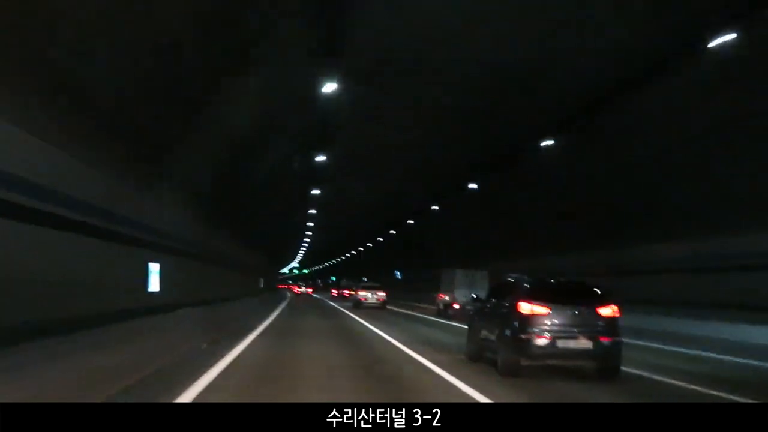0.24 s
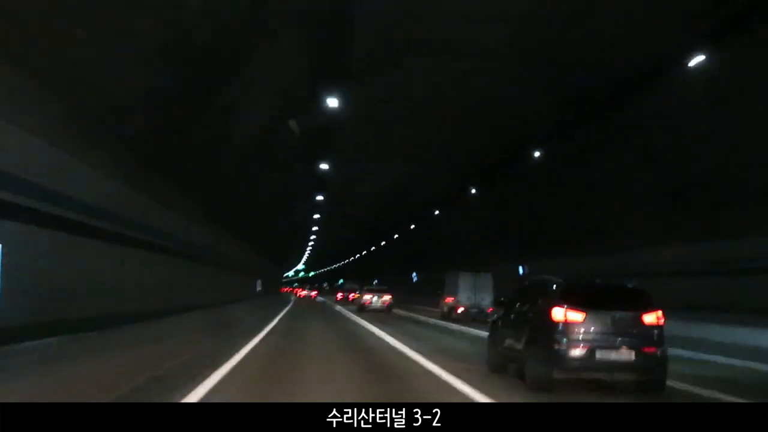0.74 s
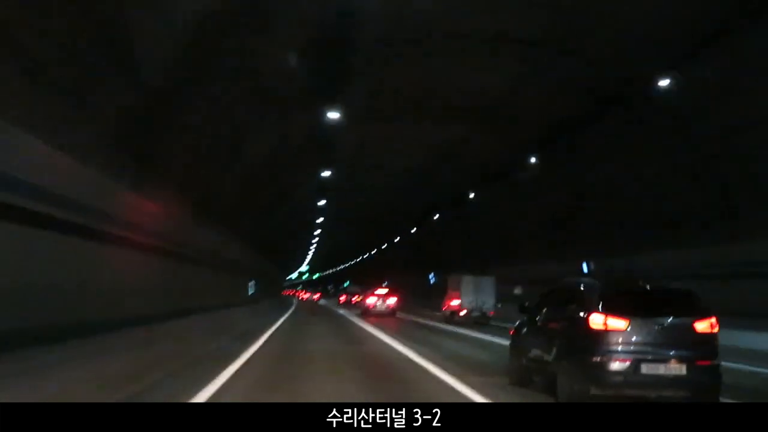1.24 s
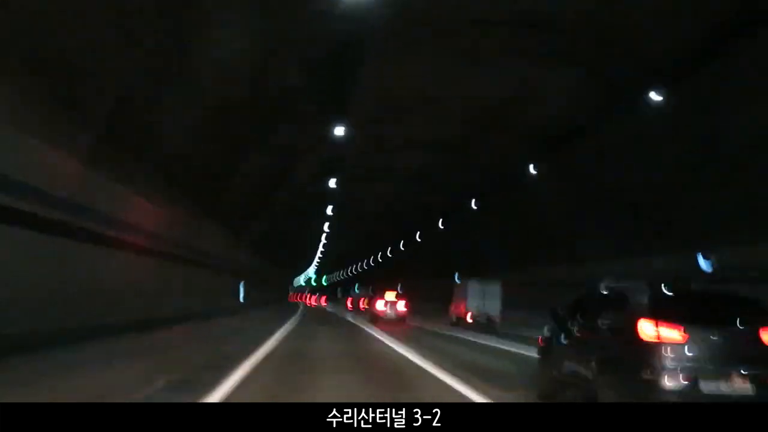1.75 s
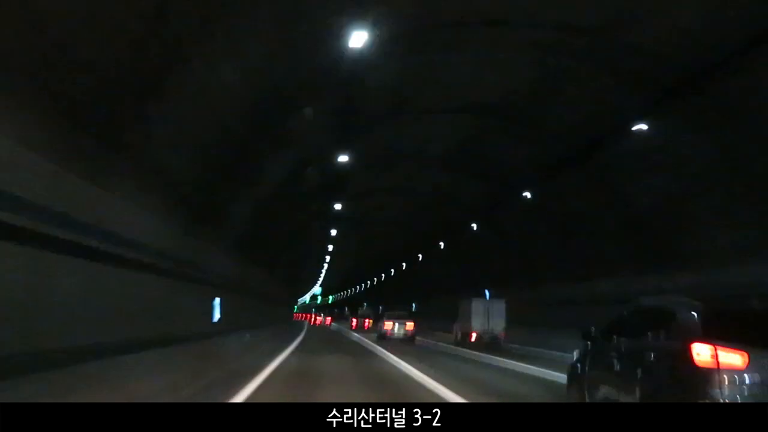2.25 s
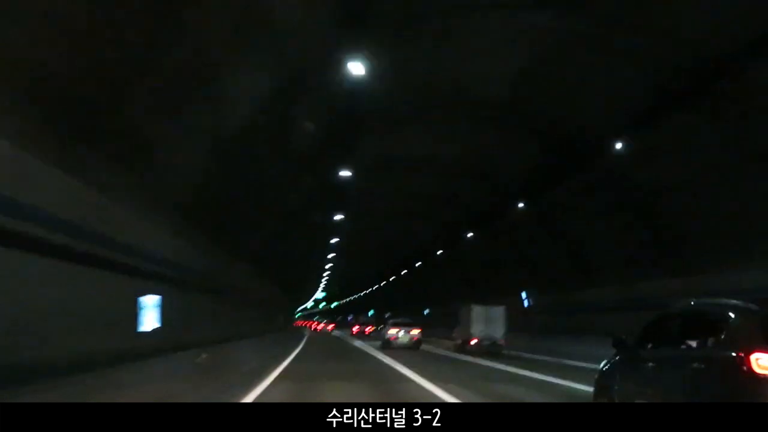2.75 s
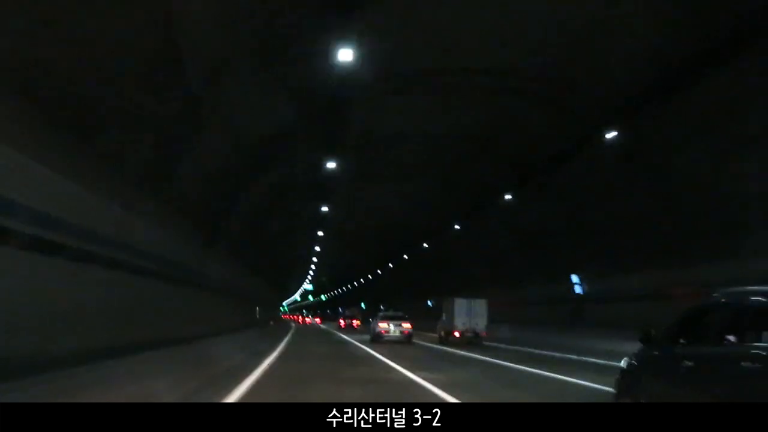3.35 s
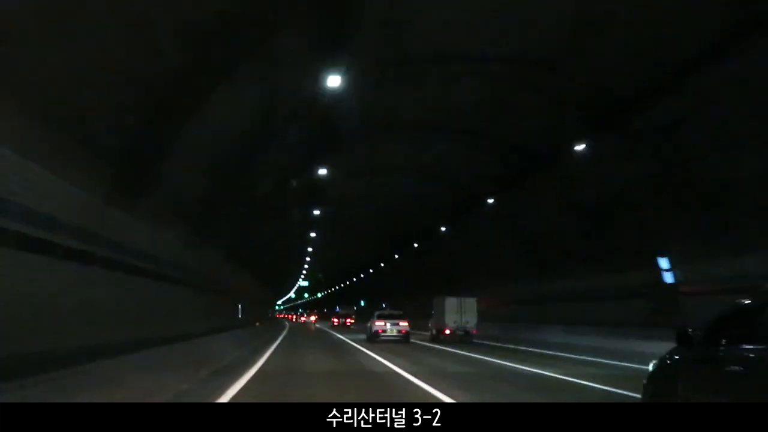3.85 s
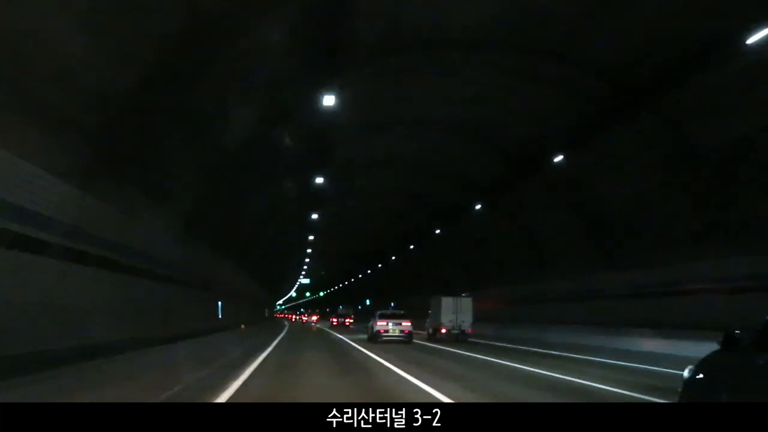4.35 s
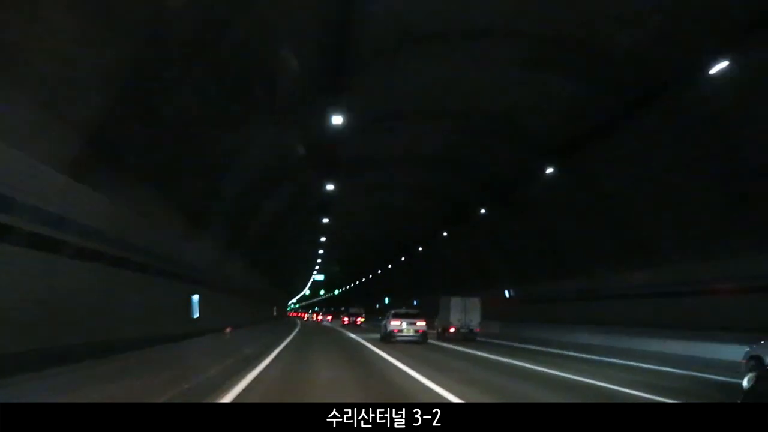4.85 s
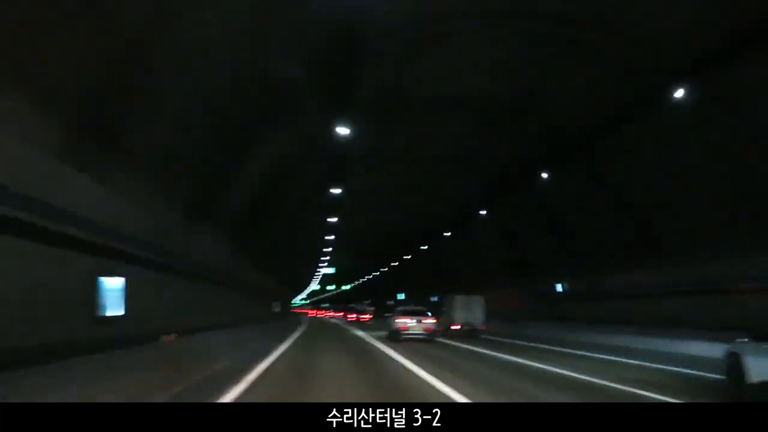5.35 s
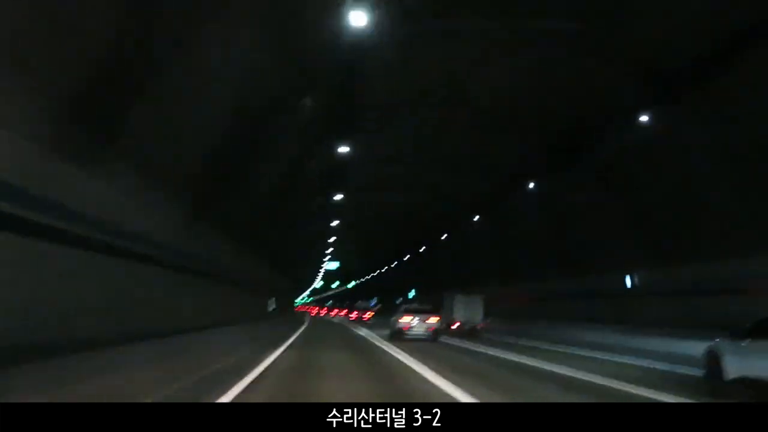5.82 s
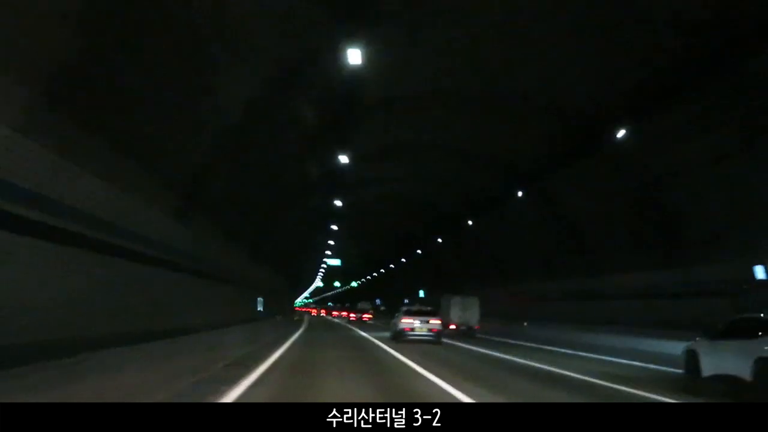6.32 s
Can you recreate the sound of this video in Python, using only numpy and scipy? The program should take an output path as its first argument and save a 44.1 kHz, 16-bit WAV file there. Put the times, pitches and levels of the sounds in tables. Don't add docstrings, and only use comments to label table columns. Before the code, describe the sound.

Inside a moving car in a concrete tunnel: rumbling bass, dull road rush, then a quick slap and deep thump past the middle.

```python
import sys
import numpy as np
from scipy import signal
from scipy.fft import irfft
from scipy.io import wavfile
from scipy.ndimage import uniform_filter1d

SR = 44100
rng = np.random.default_rng(int(sys.argv[2]) if len(sys.argv) > 2 else 0)


def persist_wave(psi):
    counts = np.round(np.clip(psi, -1, 1) * 32767).astype(np.int16)
    wavfile.write(sys.argv[1], SR, np.atleast_2d(counts).T)


def ratio(d):
    e = np.asarray(d, float) / 20
    return 10 ** e


N = 290178

# frequency in Hz, width in Hz, level in dB.
BOOM_MODES = [(25.6, 15, -15), (34, 11, -12), (44.2, 7.1, -6.5), (52.5, 4, -11.5)]
DRONE_MODES = [(72.1, 18, -4), (83.8, 20, -8)]
SEAT_MODES = [(103.7, 17, -3), (111, 18, -12.5)]
DOOR_MODES = [(136.7, 23, -3), (155.7, 10, 0.5), (174.7, 15, -4.5)]
ROOF_MODES = [(191.6, 15.6, 1), (211.8, 12, 0), (218, 13, -2.5), (246.7, 16, -2), (285.3, 64, -9.5)]
# centre in seconds, pitch in Hz, change in
# dB, length in seconds.
ROAD_STRETCHES = [(.11, 44, 4.5, .12), (0.591, 44, 9, 0.11), (0.79, 44, 6, 0.068), (1.2, 44, 4.5, 0.14),
                  (1.522, 44, 4, .15), (1.964, 44, 7.5, 0.062), (2.2, 44, 3, .2), (2.45, 44, 2.5, 0.24),
                  (5.476, 44, 4.5, 0.066), (6.095, 44, 2.5, 0.49), (.76, 75, 1.5, 0.11), (1.05, 75, 1, 0.27),
                  (1.75, 75, 5, 0.14), (2.838, 75, 4.5, .2), (3.154, 75, 4, 0.4), (3.9, 75, 2.5, 0.16),
                  (4.53, 215, 2.5, 0.21), (5.95, 75, 4, 0.48), (0.497, 105, 9, 0.35), (1.16, 105, 3.5, 0.12),
                  (2.42, 105, 1, 0.17), (4.1, 105, 4.5, 0.56), (2.425, 196, 1.5, 0.13), (5.46, 105, 6, 0.32),
                  (6.45, 105, 5, .35), (0.147, 120, 6.5, .15), (1.218, 156, 6, 0.067), (1.97, 150, 5, 0.27),
                  (3.714, 162, 6.5, 0.15), (6.038, 151, 6, 0.13),
                  (2.3, 36, 5.5, .15), (1.36, 44, -4, .1), (1.82, 43, -6.5, 0.17), (5.1, 156, -9.5, .3),
         (2.3, 110, -3, 0.24), (4.4, 44, -6, 0.48), (5.1, 44, -4, .2), (6.49, 44, -1, 0.11),
         (.14, 71, -4.5, .12), (0.47, 67, -11, .2), (2.27, 74, -9, 0.31), (2.63, 75, -1, .12),
         (4.2, 75, -10, 0.14), (4.43, 84, -7, 0.093), (4.97, 75, 4, 0.12), (1.02, 110, -3, 0.099),
         (1.9, 105, -3, .4), (2.2, 105, -4.5, .15), (3.31, 105, -14, 0.14), (5.98, 110, -5.5, 0.28),
         (5.17, 86, -5.5, 0.14), (5.78, 74, -1.5, 0.13), (.6, 156, -2, 0.35), (6, 250, -3, 0.28),
         (6.3, 156, -3, .15), (4.15, 127, -7, 0.2), (0.18, 215, -3, .15), (1.15, 230, -3.5, .35),
         (1.88, 215, -2, 0.13), (6.48, 120, -5, 0.086)]
# frequency in Hz, spectrum level in dB.
ROAR_SPECTRUM = [(120, -15), (275, -1), (320, -0.5), (372, -2), (440, -0.5), (582, -5.5), (870, -6.5),
                 (1080, -14), (1500, -15.5), (2500, -25.5), (3400, -31), (5000, -42), (8000, -54),
                 (15000, -72.5)]
# start in seconds, thud level in dB, thud pitch in Hz, thud decay by 60 dB in
# seconds, slap level relative to the thud in dB.
AXLES = [
    (4.643, -13, 85, .2, 1),
    (4.796, -1.5, 47, .16, -23),
]
# start in seconds, level in dB, lowest Hz, highest Hz, decay by 60 dB in seconds.
TICKS = [
    (.166, -70, 9500, 13000, .03),
    (1.437, -69, 11000, 13500, .05),
    (4.15, -75, 10000, 13000, .03),
    (4.45, -72, 9000, 12000, .03),
    (4.659, -56, 3300, 7000, .17),
    (4.66, -70, 7500, 12500, .11),
]
# start in seconds, roar level then in dB.
DUCKS = [(0, -26), (.025, -26), (0.223, -27), (0.403, -28.5), (.554, -30), (.76, -28.5), (1.172, -28.5),
         (1.382, -28), (1.53, -27.5), (1.721, -28.5), (1.961, -31), (2.11, -29.5), (2.504, -29.5),
         (2.61, -28), (2.86, -29), (2.999, -29), (3.15, -29.5), (3.749, -26), (3.946, -27.5), (4.4, -24.5),
         (4.56, -28), (4.63, -28.5), (4.685, -34), (4.74, -36.5), (4.88, -36), (5.53, -30.5), (5.801, -29),
         (5.956, -28.5), (6.306, -29.5), (6.409, -30)]
# frequency in Hz, share of the sum.
LEFT_SURPLUS = [(300, 0), (690, .035), (1200, .015), (3000, 0.0024)]
# level in dB, for sum and then difference of the ports.
HISS_DB = [
    [-78],
    [-73],
]


def cabin_modes(duck_db):
    groups = [  # modes, level dB on smooth road, share of ducking, evenness, evening time s
        (BOOM_MODES, -19.5, .7, .75, .09),
        (DRONE_MODES, -22, .78, .91, .12),
        (SEAT_MODES, -26.5, .63, .96, .21),
        (DOOR_MODES, -24.5, .71, .82, .2),
        (ROOF_MODES, -26, .86, .45, .15)]
    out = np.zeros((2, N))
    for modes, level_db, duck_share, steady, even_s in groups:
        level = ratio(level_db + duck_share * duck_db + ripples_db(modes))
        sound = level * shaken(modes, steady, even_s)
        if modes is BOOM_MODES:
            sound = sound * boom_dip()
        out += sound
    return out


def shaken(modes, steady, even_s):
    def resonance(hz):
        power = sum(ratio(2 * db) / (1 + (2 * (hz - mode_hz) / width_hz) ** 2) ** 2
                    for mode_hz, width_hz, db in modes)
        return np.sqrt(power)

    both = ports(resonance)
    size = int(even_s * SR)
    slow_power = uniform_filter1d(uniform_filter1d(both[0] ** 2, size), size)
    both = both / (abs(slow_power) + .02) ** (steady / 2)
    return both / both[0].std()


def ripples_db(modes):
    reach_octaves, jolt_db, jolt_s = .32, 9.5, .04
    t = np.arange(0, N + 100, 100) / SR
    strongest_hz = max(modes, key=lambda mode: mode[2])[0]
    swell_db = np.zeros(len(t))
    for s, hz, db, length_s in ROAD_STRETCHES:
        octaves = np.log2(hz / strongest_hz)
        swell_db += db * np.exp(-(octaves / reach_octaves) ** 2 - (2 * (t - s) / length_s) ** 2)
    since = (t - AXLES[0][0]) / jolt_s
    swell_db += jolt_db * np.maximum(since, 0) * np.exp(1 - abs(since))
    return np.interp(np.arange(N) / SR, t, swell_db)


def boom_dip():
    t = np.arange(N) / SR
    return 1 - .85 * np.exp(-((t - AXLES[1][0] - .02) / .035) ** 2)


def tyre_roar(patchy_db=.6, flicker_db=.15):
    f, db = np.transpose(ROAR_SPECTRUM)
    both = ports(lambda hz: ratio(np.interp(np.log(hz + 1), np.log(f), db)) * (hz > 100))
    hz, t, z = signal.stft(both, SR, nperseg=512, noverlap=384)
    patches = rng.standard_normal(z.shape[1:])
    patches = uniform_filter1d(patches, size=9, axis=0)
    patches = evened(uniform_filter1d(patches, size=30, axis=1))
    flicker = evened(uniform_filter1d(rng.standard_normal(len(t)), size=14))
    treble = np.clip(hz / 6000, 0, 1.5)[:, None]
    z = z * ratio(patchy_db * patches + flicker_db * treble * flicker)
    both = signal.istft(z, SR, nperseg=512, noverlap=384)[1][:, :N]
    return both / both[0].std()


def joint():
    out = np.zeros((2, N))
    t = np.arange(SR // 2) / SR
    rise = 1 - np.exp(-t / .0025)
    for s, db, hz, t60_s, slap_db in AXLES:
        thud = -np.sin(2 * np.pi * hz * t) * ratio(db - 60 * t / t60_s)
        slap = evened(band(rng.standard_normal((2, len(t))), 130, 800, order=4))
        slap = slap * ratio(db + slap_db - 60 * t / .09)
        add(out, s - .009, rise * np.array([slap[0], .05 * slap[1]]))
        add(out[0], s, rise * thud)
    return out


def trim_ticks():
    out = np.zeros((2, N))
    t = np.arange(SR // 8) / SR
    for s, db, lo_hz, hi_hz, t60_s in TICKS:
        burst = evened(band(rng.standard_normal((2, len(t))), lo_hz, hi_hz, order=3))
        add(out, s, burst * ratio(db - 60 * t / t60_s) * [[1], [.6]])
    return out


def hiss():
    return ratio(np.array(HISS_DB)) * band(rng.standard_normal((2, N)), 8500, 14000, order=3)


def gain_db():
    climb_db_per_s, fall_s = 8, .016
    t = np.arange(N) / SR
    s, db = np.transpose(DUCKS)
    last = np.searchsorted(s, t, "right") - 1
    return uniform_filter1d(db[last] + climb_db_per_s * (t - s[last]), int(fall_s * SR))


def ports(shape):
    hz = np.fft.rfftfreq(N, 1 / SR)
    total, other = rng.standard_normal((2, len(hz))) + 1j * rng.standard_normal((2, len(hz)))
    difference = other * unlike(hz) + total * np.interp(hz, *np.transpose(LEFT_SURPLUS))
    both = irfft(np.array([total, difference]) * shape(hz), N)
    return both / both[0].std()


def unlike(hz):
    spacing_m, mono_hz, mismatch_db = .018, 190, -37
    same = np.sinc(2 * hz * spacing_m / 343)
    apart = np.hypot(np.sqrt((1 - same) / (1 + same)), ratio(mismatch_db))
    return apart / np.sqrt(1 + (mono_hz / (hz + 1)) ** 6)


def evened(x):
    return x / np.sqrt(np.mean(x ** 2) + 1e-20)


def add(mix, s, sound):
    part = mix[..., round(s * SR):][..., :sound.shape[-1]]
    part += sound[..., :part.shape[-1]]


def band(x, lo_hz, hi_hz, order=2):
    edges_hz = [lo_hz, min(hi_hz, SR * .49)]
    return signal.sosfilt(signal.butter(order, edges_hz, "band", fs=SR, output="sos"), x)


def scene():
    roar_db = gain_db()
    duck_db = roar_db - roar_db.mean()
    mix = cabin_modes(duck_db)
    mix += ratio(roar_db) * tyre_roar()
    mix += joint()
    mix += ratio(duck_db) * trim_ticks()
    mix += ratio(.6 * duck_db) * hiss()
    total, difference = mix
    return np.array([total + difference, total - difference])


def band_limit(x):
    return signal.sosfilt(signal.butter(12, 15100, fs=SR, output="sos"), x)


def record(dry):
    cut = signal.sosfilt(signal.butter(2, 16, "high", fs=SR, output="sos"), dry)
    mix = cut * np.interp(np.arange(N), [0, 200, N - 200, N], [.6, 1, 1, .15])
    return band_limit(mix)


dry = scene()
out = record(dry)
persist_wave(out)
```